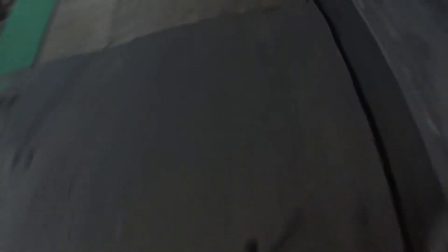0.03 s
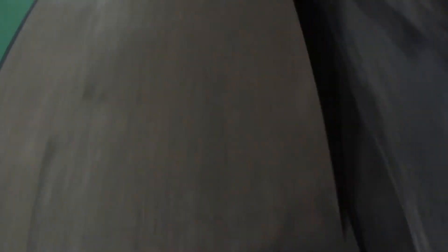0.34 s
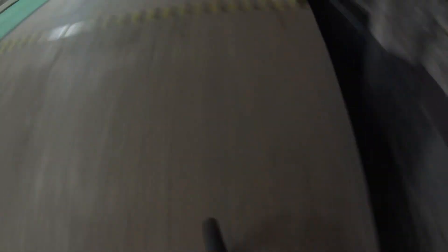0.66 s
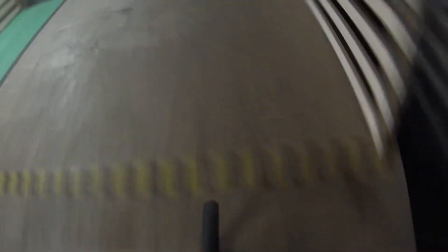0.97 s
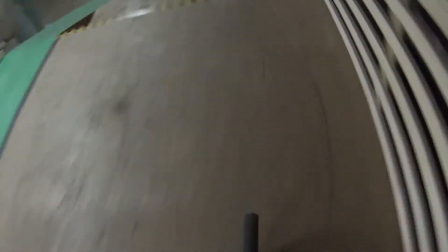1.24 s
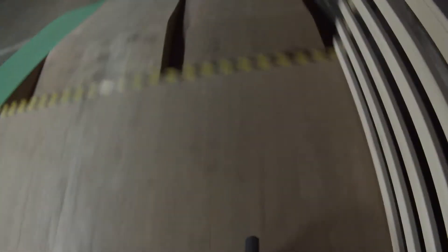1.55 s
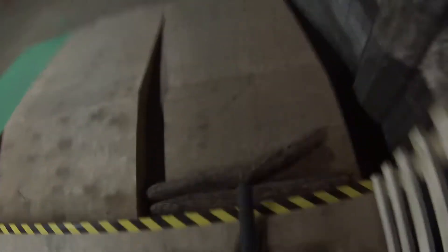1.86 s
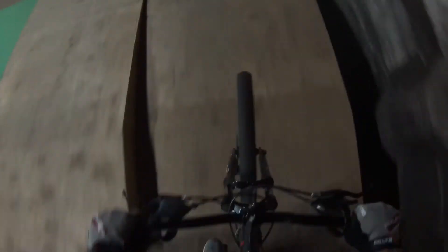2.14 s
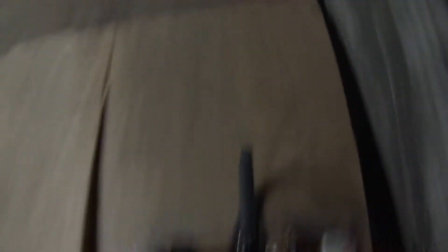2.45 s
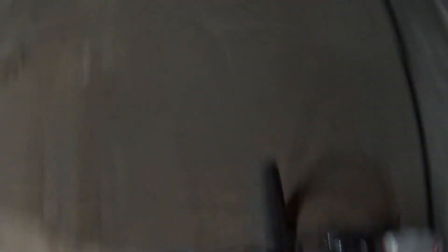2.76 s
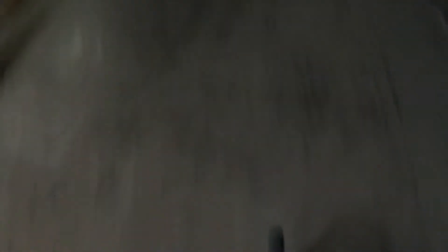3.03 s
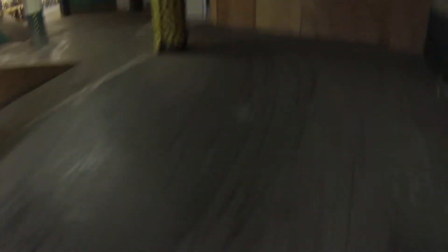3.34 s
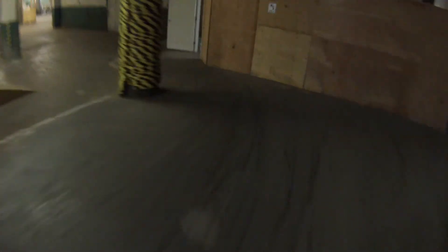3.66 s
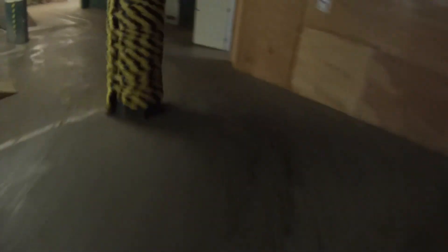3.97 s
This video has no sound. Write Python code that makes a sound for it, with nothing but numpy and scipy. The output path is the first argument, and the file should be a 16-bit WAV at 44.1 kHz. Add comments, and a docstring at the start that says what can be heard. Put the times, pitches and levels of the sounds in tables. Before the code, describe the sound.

A bicycle rumbles across plywood ramps indoors, with low thumps and chain jingle at each jolt. A heavy, clattering landing follows, then a deeper roll on level floor. The microphone rides on the chest, with faint hall echo.

```python
"""Bicycle on indoor plywood ramps

A large hall, heard from a microphone on the rider's chest. Just below it the tyres roar on the boards,
the hollow decks rumble, boom and thump, and the bike lands hard at 2.5 s, then reaches the flat floor.
Jolts make the frame knock and the chain rattle close by; farther off, the hall rings on after them."""
import sys
import numpy as np
from scipy import signal
from scipy.fft import rfft, irfft, next_fast_len
from scipy.io import wavfile
from scipy.ndimage import map_coordinates

SR = 44100
rng = np.random.default_rng(int(sys.argv[2]) if len(sys.argv) > 2 else 0)


def dump_mix(stems):
    """Bounce the given channels to the path in sys.argv[1] as a 16-bit WAV at rate SR."""
    frames = np.atleast_2d(stems).T  # one column per channel
    limited = np.clip(frames, -1, 1)  # hard clip at full scale
    pcm = np.round(limited * 32767).astype(np.int16)
    wavfile.write(sys.argv[1], SR, pcm)


N = 176400

# spectrum of the tread's hiss (frequency [Hz], relative level [dB])
TREAD_COLOUR = [(900, -0.5), (1400, -5), (1750, 5), (2100, -2.5), (2550, -5), (3050, -1), (3900, -9.5),
                (4750, -14.5), (5400, -11), (6300, -21), (8500, -24.5), (10500, -33.5), (13300, -35),
                (15000, -55)]
# modes of chain and sprockets (frequency [Hz], relative level [dB], t60 [s])
STEEL_MODES = [(5420, 6.5, 0.074), (5774, 1, 0.048), (6420, -3.5, 0.085), (6950, -4.5, 0.08),
               (7420, -7, 0.074), (7940, -6, 0.068), (8670, -4.5, 0.065), (9625, -5.5, 0.11),
               (11100, -4, 0.09), (11370, -7.5, 0.074), (13150, -10, .06)]


def amp(db):
    """Decibels to gain."""
    return 10 ** (np.asarray(db) / 20)


def along(points, hz):
    """Read (Hz, value) points on a log frequency axis."""
    freqs, values = np.transpose(points)
    return np.interp(np.log(hz + 1), np.log(freqs + 1), values)


def curve(rows):
    """Join (s, value) points, one value per sample."""
    return np.interp(np.arange(N) / SR, *np.transpose(rows))


def wobble(rate_hz):
    """A smooth random curve with rate_hz knots a second."""
    knots = rng.standard_normal(int(N * rate_hz / SR) + 4)
    return map_coordinates(knots, [np.arange(N) * rate_hz / SR])


def swell(s, width_s):
    """A smooth rise and fall around time s."""
    return np.exp(-.5 * ((np.arange(N) / SR - s) / width_s) ** 2)


def rise(t, attack_s):
    """An onset that climbs from 0 towards 1."""
    return 1 - np.exp(-t / attack_s)


def noise(colour, size=N):
    """Noise of rms 1 with the given spectrum."""
    gain = amp(along(colour, np.fft.rfftfreq(size, 1 / SR)))
    shaped = irfft(rfft(rng.standard_normal(size)) * gain, size)
    return shaped / np.sqrt(np.mean(shaped ** 2) + 1e-20)


def focused(colour, pitch, width_oct, boost_db):
    """A spectrum with one broad resonance raised at the pitch."""
    hz = np.geomspace(100, SR / 2, 200)
    resonance_db = boost_db * np.exp(-(np.log2(hz / pitch) / width_oct) ** 2)
    return np.column_stack([hz, along(colour, hz) + resonance_db])


def burst(colour, t, t60, attack_s):
    """Coloured noise that starts quickly and dies away."""
    return noise(colour, size=len(t)) * amp(-60 * t / t60) * rise(t, attack_s)


def ringing(modes, t, detune, scatter_db, pitch=1):
    """Struck modes, their frequencies times pitch, a little different at each blow."""
    out = np.zeros(len(t))
    for mode, db, t60 in modes:
        envelope = amp(db + scatter_db * rng.normal() - 60 * t / t60)
        hz = pitch * mode * (1 + detune * rng.normal())
        out += envelope * np.sin(2 * np.pi * hz * t)
    return out


def add(track, s, sound):
    """Mix a sound into the track at time s."""
    part = track[max(round(s * SR), 0):][:len(sound)]
    part += sound[:len(part)]


def tyres(ramp_db=2.5, floor_db=3.5, floor_at_s=3.1, fade_s=0.16, rough_db=0.56, grain_db=2):
    """Roar and grainy tread hiss follow the load; the roar deepens on the flat floor."""
    # loudness of the roar and of the hiss (time [s], relative level [dB])
    roar_level = [(0, -20.5), (.06, -23), (.2, -27), (.38, -30), (.49, -25), (.72, -26), (.85, -28.5),
                  (1.3, -31), (1.72, -30), (1.86, -26), (1.98, -27), (2.08, -30), (2.45, -33), (2.53, -27),
                  (2.68, -27.5), (2.77, -30), (2.84, -27.5), (3.02, -27), (3.15, -29), (4, -31.5)]
    hiss_level = [(0, -37), (.3, -38.5), (.95, -39), (1.35, -41.5), (1.72, -43.5), (1.93, -39.5),
                  (2.1, -42.5), (2.45, -41.5), (2.6, -39.5), (3, -39.5), (3.3, -42), (3.7, -41), (4, -40.5)]
    # spectrum of the roar on each surface (frequency [Hz], relative level [dB])
    ramp_colour = [(110, -17), (150, -0.5), (200, -1.5), (265, -2), (340, -1.5), (530, -4), (660, -9.5),
                   (820, -7.5), (1030, -9), (1230, -17.5), (1500, -25), (2000, -60), (3000, -120)]
    floor_colour = [(88, -19), (150, -4.5), (221, -4), (315, -3.5), (425, -11.5), (468, -8), (556, -11),
                    (825, -14), (991, -13.5), (1500, -29), (1950, -60), (3300, -120)]
    floor_share = np.clip((np.arange(N) / SR - floor_at_s) / fade_s + .5, 0, 1)
    on_ramp = np.sqrt(1 - floor_share) * amp(ramp_db) * noise(ramp_colour)
    on_floor = np.sqrt(floor_share) * amp(floor_db) * noise(floor_colour)
    hiss = noise(TREAD_COLOUR) * amp(curve(hiss_level) + grain_db * wobble(350))
    roar = (on_ramp + on_floor) * amp(curve(roar_level) + rough_db * wobble(40))
    return roar + hiss


def rumble():
    """Decks and bike shake low beneath the microphone."""
    # spectrum of the shaking (frequency [Hz], relative level [dB])
    colour = [(12, -14), (25, 4.5), (38, -2), (60, -2), (115, -2), (160, -10.5), (230, -16.5), (400, -46),
              (1000, -110)]
    # its loudness (time [s], level [dB])
    level = [(0, -10.5), (.15, -23), (.4, -22), (.7, -21), (.85, -25.5), (1.3, -28.5), (1.65, -30.5),
             (2.35, -32), (2.47, -20.5), (2.62, -17), (2.8, -22.5), (3.1, -25.5), (3.3, -23), (3.45, -21.5),
             (3.7, -18.5), (4, -23.5)]
    return noise(colour) * amp(curve(level))


def thumps(attack_s=0.0021):
    """A soft tyre blow pushes the deck down and rings its low modes; each spot has its own pitch."""
    # wheels hit the deck (time [s], level [dB], pitch [Hz])
    hits = [(.002, -29, 110), (0.024, -24, 60), (0.054, -18, 52.5), (0.183, -14.5, 49), (0.542, -7, 88),
            (0.571, -10, 43.8), (0.638, -11, 59.7), (0.665, -9, 126.2), (2.493, -2.5, 76),
            (3.486, -18, 71.5), (3.678, -8, 61.3)]
    # modes of the deck (frequency [multiple of the pitch], relative level [dB], t60 [s])
    deck_modes = [(.48, -11, 0.095), (1, 2, 0.14), (1.45, -9.5, 0.19), (2.85, -11, 0.091)]
    out, t = np.zeros(N), np.arange(SR // 2) / SR
    for s, db, pitch in hits:
        ring = ringing(deck_modes, t, detune=0.038, scatter_db=0, pitch=pitch)
        add(out, s, -amp(db) * ring * rise(t, attack_s))
    return out


def booms(wander_share=0.048, rough_db=2.5):
    """A wheel rolling across a hollow panel swells that panel's unsteady note."""
    # panel crossings (time [s], pitch [Hz], level [dB], width [s])
    crossings = [(0.029, 346, -25.5, 0.021), (.5, 551, -29.5, 0.027), (.725, 363, -27, 0.018),
                 (1.02, 554, -30.5, 0.066), (1.855, 375, -25, 0.018), (1.978, 321, -21, 0.025),
                 (2.52, 329, -26, 0.014), (3.015, 350, -19.5, 0.0053), (3.034, 230, -24.5, 0.02)]
    out = np.zeros(N)
    for s, hz, db, width_s in crossings:
        phase = 2 * np.pi * np.cumsum(hz * (1 + wander_share * wobble(120))) / SR
        out += amp(db) * swell(s, width_s) * np.sqrt(2) * np.sin(phase)
    return out * amp(rough_db * wobble(90))


def knocks(attack_s=0.0026):
    """Jolts knock boards and frame: a dull thud with the hollow ring of plywood."""
    # jolts (time [s], level [dB], pitch of the ring [Hz])
    jolts = [(.03, -23.5, 707), (.14, -27, 886), (.25, -34, 602), (.64, -21.5, 434), (1.961, -26.5, 826),
             (2.491, -12.5, 317), (2.497, -24.5, 600), (2.515, -16, 448), (2.568, -23.5, 858),
             (2.641, -19.5, 787), (2.801, -21.5, 693)]
    # spectrum of the thud (frequency [Hz], relative level [dB])
    colour = [(100, -24), (250, 10), (520, 3.5), (900, 3.5), (1400, -16.5), (1900, -8), (2500, -9),
              (3200, -10.5), (4200, -14.5), (5000, -37), (7000, -31), (15000, -61)]
    # modes of the boards (frequency [multiple of the pitch], relative level [dB], t60 [s])
    plywood_modes = [(0.794, -6.5, 0.15), (1.004, -1.5, 0.12), (1.138, 4.5, 0.054)]
    out, t = np.zeros(N), np.arange(SR // 4) / SR
    for s, db, pitch in jolts:
        ring = ringing(plywood_modes, t, detune=0.0036, scatter_db=4, pitch=pitch)
        thud = burst(colour, t, t60=0.061, attack_s=attack_s)
        add(out, s, amp(db) * (thud + ring * rise(t, attack_s)))
    return out


def clacks():
    """Hard parts of the bike clack near the microphone, each with its own resonance."""
    # strikes (time [s], level [dB], pitch of the struck part [Hz])
    strikes = [(.031, -25, 3000), (.138, -32, 2980), (0.22, -26, 2400), (0.248, -23, 1790),
               (0.314, -21.5, 2790), (1.959, -17.5, 2230), (1.961, -19, 4300), (1.966, -18, 3720),
               (1.975, -21, 5250), (2.497, -22, 1950), (2.53, -21, 1900), (2.567, -20.5, 2000),
               (2.573, -19.5, 3700), (2.637, -28, 1800), (2.801, -27.5, 3000), (3.488, -30, 3170),
               (3.569, -25, 2400), (3.579, -22, 4000)]
    # spectrum of a clack (frequency [Hz], relative level [dB])
    colour = [(800, -18), (1800, 1), (2600, -11), (3400, -1.5), (4300, -11), (5000, -11), (8000, -16),
              (11000, -31), (15000, -38)]
    out, t = np.zeros(N), np.arange(SR // 4) / SR
    for s, db, pitch in strikes:
        part_colour = focused(colour, pitch, width_oct=0.18, boost_db=9)
        add(out, s, amp(db) * burst(part_colour, t, t60=0.024, attack_s=0.0021))
    return out


def link(t, tint_db=4.5, ring_db=-15):
    """One chain link ticks, with a tint of its own, and rings the steel."""
    # spectrum of the tick (frequency [Hz], relative level [dB])
    colour = [(1500, -23), (3000, 10.5), (4700, 1.5), (5400, 3), (6200, -1.5), (7200, -1.5), (8400, -1),
              (10300, -6.5), (11300, -13), (12300, -13), (13300, -6), (14200, -29), (15200, -19)]
    tinted = [(hz, db + tint_db * rng.normal()) for hz, db in colour]
    tick = burst(tinted, t, t60=0.047, attack_s=0.0011)
    return tick + amp(ring_db) * ringing(STEEL_MODES, t, detune=0.0248, scatter_db=3)


def chain(links=14, contact_db=-3, jingle_db=-3, spread_db=3.5, loss_db_per_s=76):
    """Each slap is one firm contact amid a jingle of loose links that builds and thins out."""
    # slaps of the chain (time [s], relative level [dB])
    slaps = [(0.042, -39), (0.17, -42), (0.212, -35.5), (0.242, -38), (.318, -39), (0.489, -48),
             (0.648, -46), (.725, -43), (0.773, -38), (0.817, -40.5), (0.846, -49), (0.949, -47),
             (1.009, -47), (1.265, -48), (1.969, -40.5), (2.508, -35), (2.53, -32), (2.573, -28),
             (2.594, -38), (2.803, -33.5), (2.82, -43), (2.891, -50), (3.025, -40.5), (3.09, -47),
             (3.494, -42), (3.506, -32.5), (3.518, -43), (3.541, -42), (3.58, -36), (3.612, -54)]
    mean_delay_s, lead_s = .035, .008
    out, t = np.zeros(N), np.arange(SR // 10) / SR
    for s, db in slaps:
        add(out, s, amp(db + contact_db) * link(t))
        delays = -mean_delay_s * np.log((np.arange(links) + rng.random(links)) / links)
        for delay, strength in zip(delays, rng.uniform(-1, 1, links)):
            link_db = db + jingle_db + spread_db * strength - loss_db_per_s * delay
            add(out, s - lead_s + delay, rise(delay, lead_s) * amp(link_db) * link(t))
    return out


def clinks(attack_s=0.0024, ring_db=-21.5):
    """Steel meets steel once: a dry tick, brightest near one pitch, and a faint ring."""
    # chain strikes sprocket (time [s], level [dB], brightest pitch [Hz])
    strikes = [(.211, -32, 9900), (.243, -37, 7500), (.319, -31, 8500), (.381, -33, 8700),
               (.559, -40, 6100), (.68, -43, 11400), (.729, -44, 11400), (1.061, -44, 11400),
               (1.159, -32.5, 5900), (1.165, -36, 9600), (2.571, -24, 7350), (2.65, -41, 9600),
               (3.506, -33, 5740), (3.579, -31.5, 9050)]
    # spectrum of the tick (frequency [Hz], relative level [dB])
    colour = [(4000, -20), (5500, -3), (11400, -4), (13300, -9), (15000, -32)]
    out, t = np.zeros(N), np.arange(SR // 6) / SR
    for s, db, pitch in strikes:
        tick_colour = focused(colour, pitch, width_oct=0.12, boost_db=11.5)
        tick = burst(tick_colour, t, t60=0.034, attack_s=attack_s)
        ring = ringing(STEEL_MODES, t, detune=0.0156, scatter_db=2) * rise(t, attack_s)
        add(out, s, amp(db) * (tick + amp(ring_db) * ring))
    return out


def hall(sound):
    """The far walls return a tail in which each frequency dies at its own speed."""
    # reverberation of the hall (frequency [Hz], t60 [s])
    decay_times = [(100, 1.9), (1000, 0.4), (5000, 1.87), (13000, 0.78)]
    hz, t, spectra = signal.stft(rng.standard_normal(SR * 2), SR, nperseg=256)
    envelope = amp(-60 * t / along(decay_times, hz)[:, None]) * rise(t, attack_s=0.0028)
    _, tail = signal.istft(spectra * envelope, SR, nperseg=256)
    return signal.fftconvolve(sound, tail / np.linalg.norm(tail))[:N]


def scrub(at_s=1.925, pitch_hz=1750, level_db=-36):
    """The tread scuffs on the steep ramp: its hiss narrows around one pitch."""
    colour = focused(TREAD_COLOUR, pitch_hz, width_oct=.15, boost_db=14)
    return amp(level_db) * swell(at_s, width_s=.025) * noise(colour)


def scene():
    """Mono, at the rider's chest: bike and decks up close, the hall behind the blows and the rattle."""
    blows = knocks() + clacks()
    rattle = chain() + clinks()
    reverb = hall(amp(-10) * blows + amp(-5) * rattle)
    wheels = tyres() + scrub() + rumble() + booms() + thumps()
    return (wheels + blows + rattle + reverb)[None]


def record(dry, overload=.97, top_hz=15400):
    """The chest microphone rounds the loudest peaks and cuts the top treble; the ends fade briefly."""
    rounded = dry / (1 + (dry / overload) ** 6) ** (1 / 6)
    faded = rounded * signal.windows.tukey(N, .001)
    padded_size = next_fast_len(N + SR // 2)
    passband = np.fft.rfftfreq(padded_size, 1 / SR) < top_hz
    return irfft(rfft(faded, padded_size) * passband, padded_size)[..., :N]


dry = scene()
out = record(dry)
dump_mix(out)
```